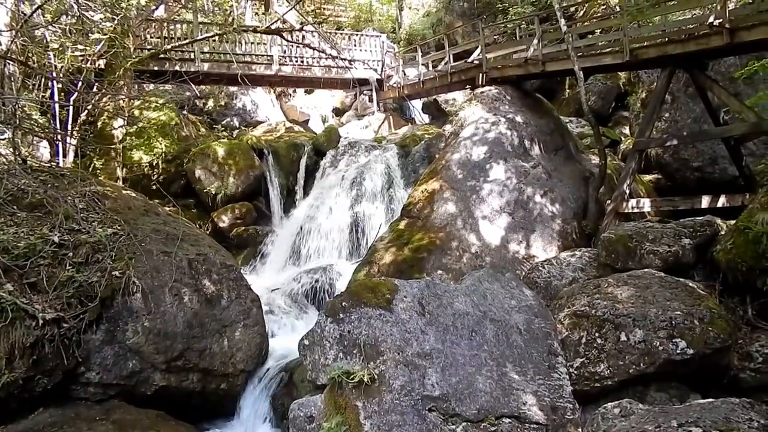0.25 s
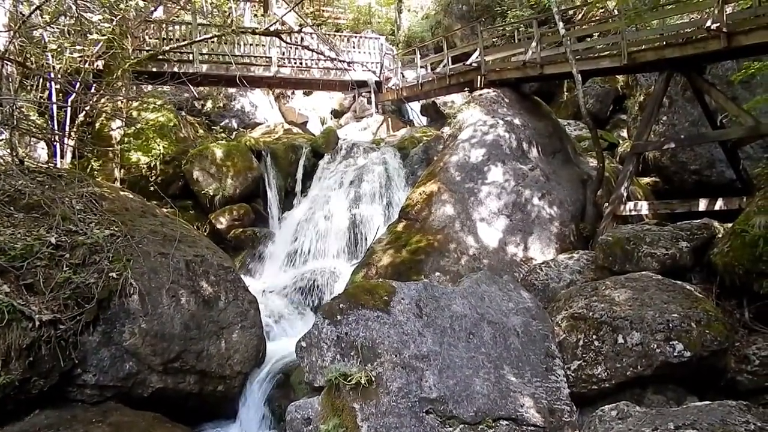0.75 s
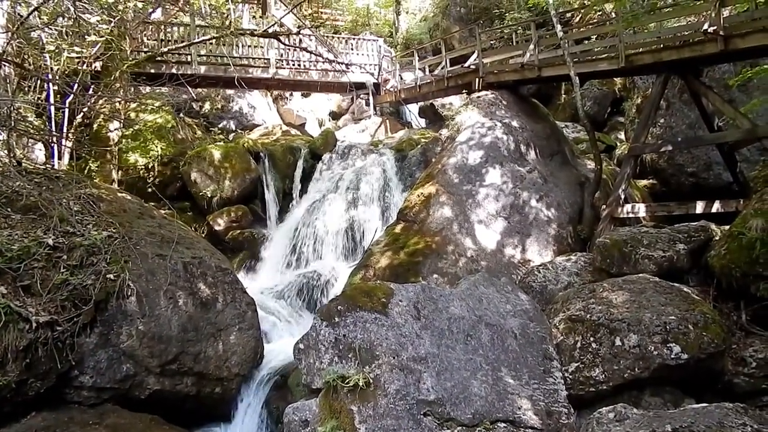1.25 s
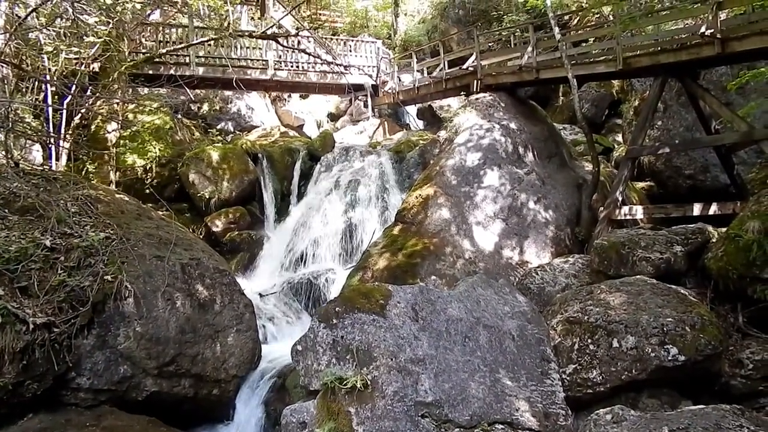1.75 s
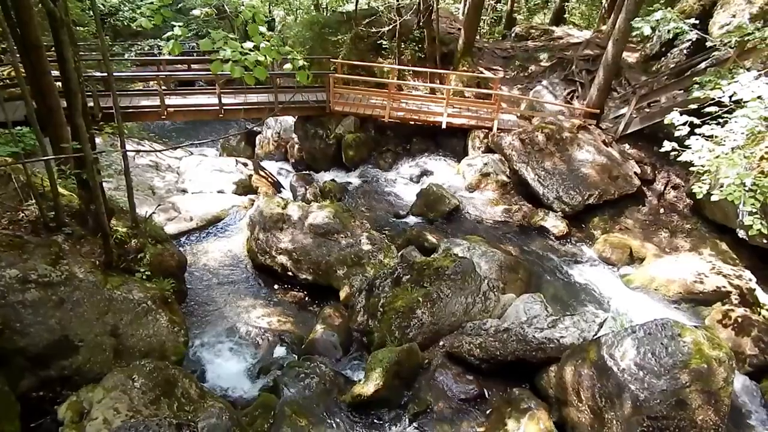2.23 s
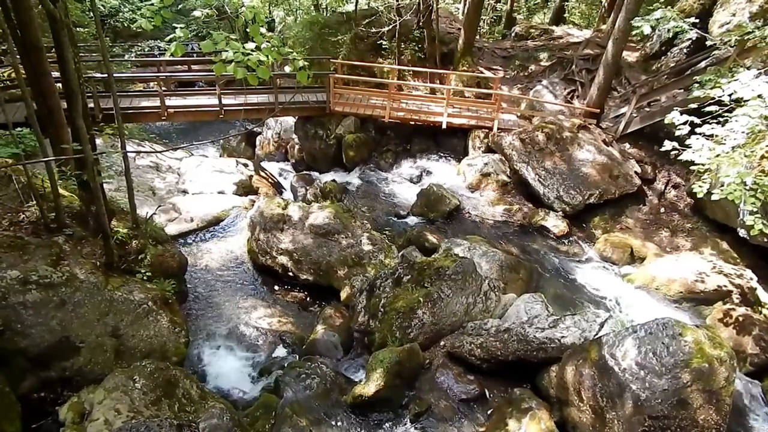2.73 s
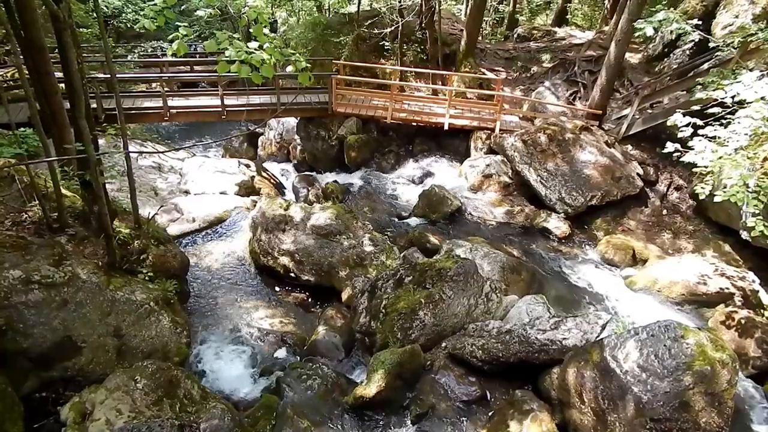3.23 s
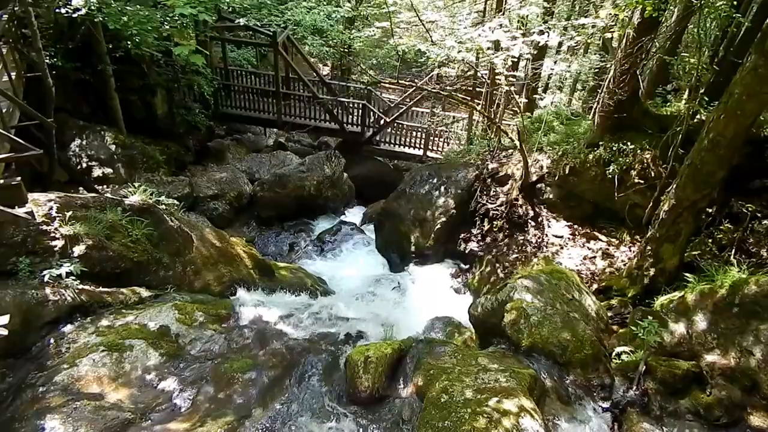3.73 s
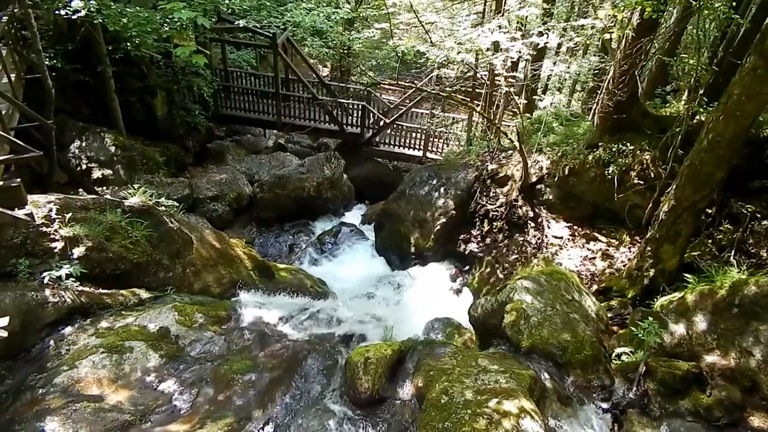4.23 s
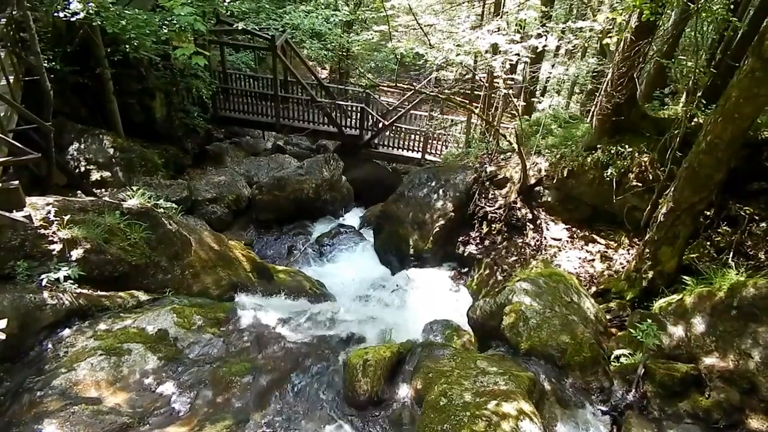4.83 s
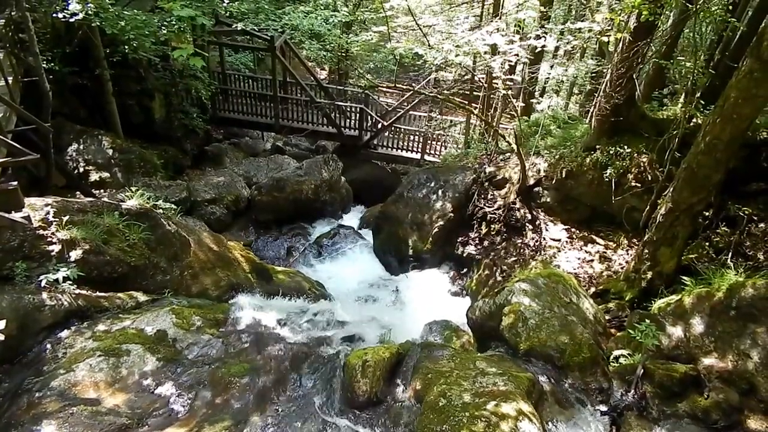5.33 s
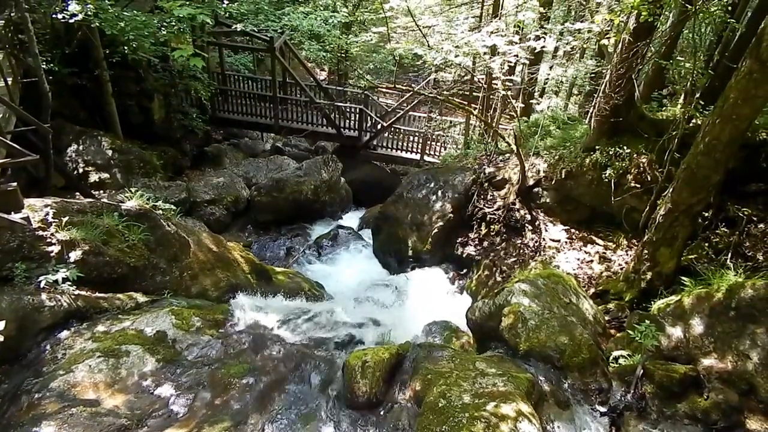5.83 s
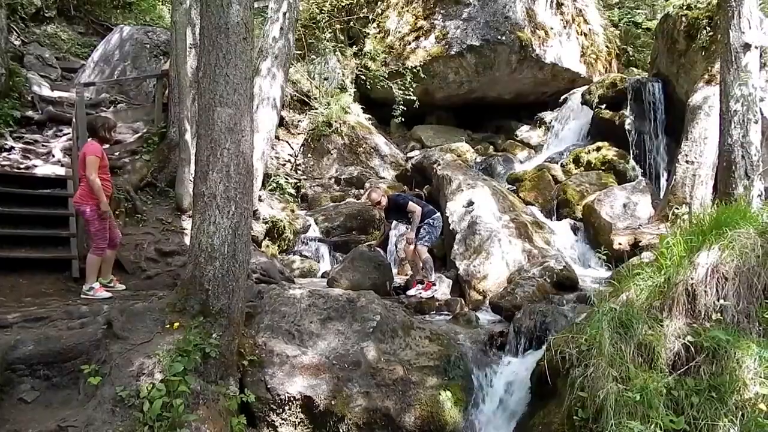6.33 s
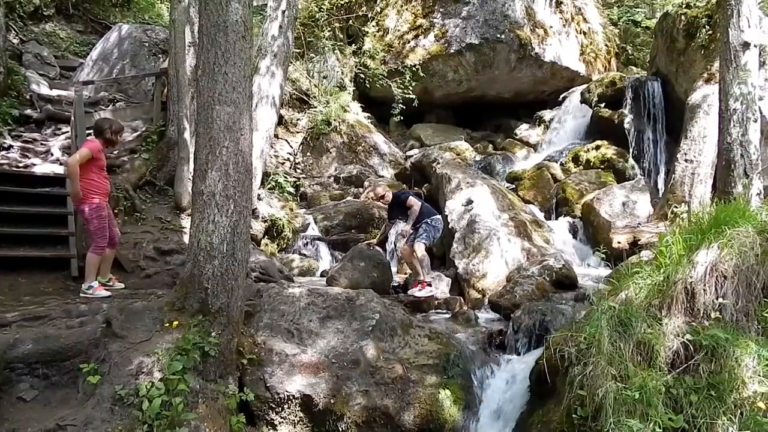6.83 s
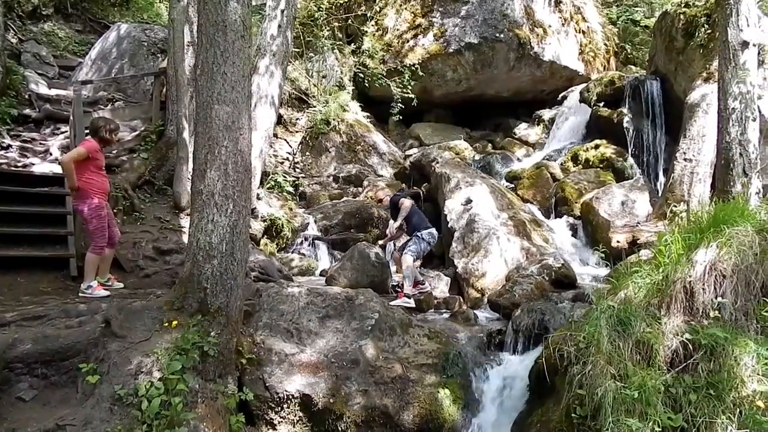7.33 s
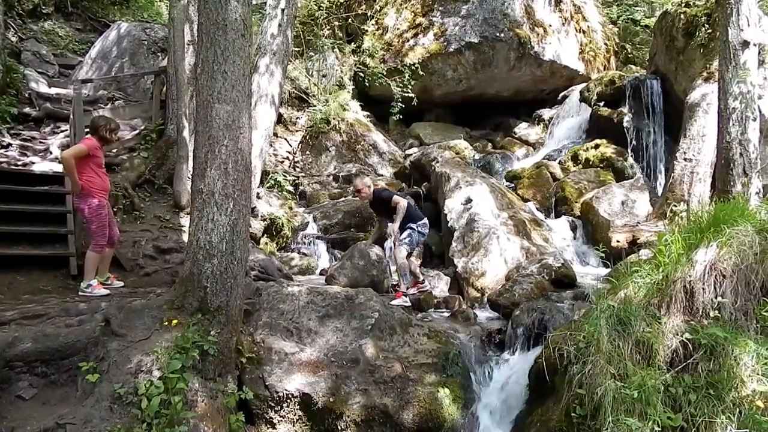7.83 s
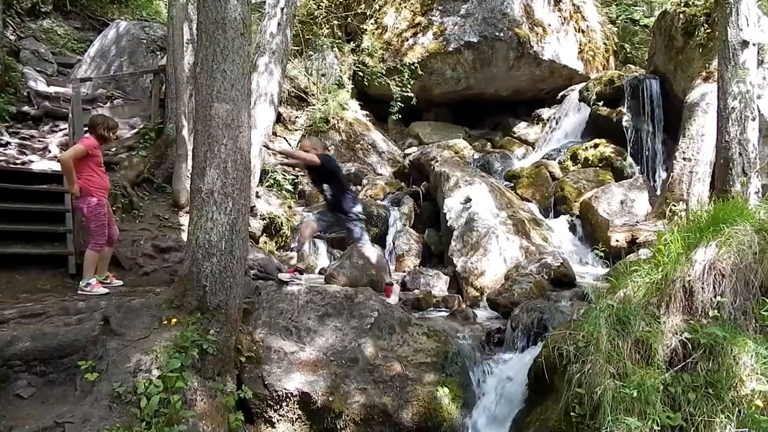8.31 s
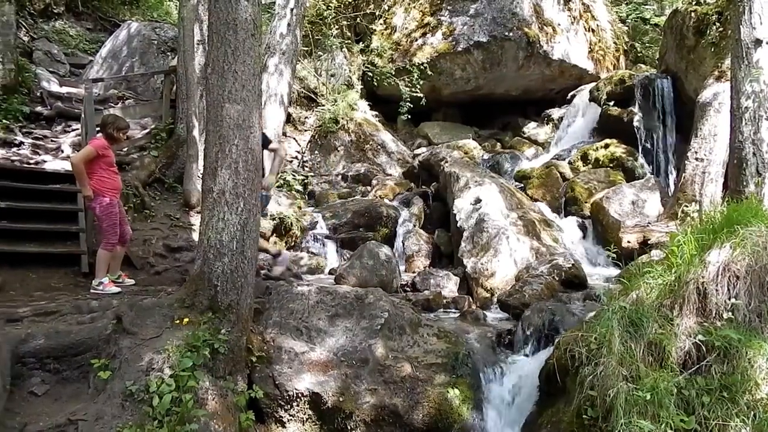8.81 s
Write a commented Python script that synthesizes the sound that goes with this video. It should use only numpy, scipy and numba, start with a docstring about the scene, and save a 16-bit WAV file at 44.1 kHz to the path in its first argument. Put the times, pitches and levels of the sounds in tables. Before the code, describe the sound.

A blackbird-like bird whistles mellow phrases and ends in fading chirps beside a gurgling, splashing brook that grows quieter in a wood.

```python
"""Songbird by a brook

A blackbird-like bird sings beside a gurgling brook in a wood; a farther bird twitters once.
Its two voices whistle, warble and chirp as sine waves with moving pitch; a noise tail scatters the song.
The brook mixes noise, mostly rising bubble rings and short puffs of hiss, and its flow swells and ebbs.
Very faint noise fills the air."""
import sys
import numpy as np
from scipy import signal
from scipy.fft import rfft, irfft, next_fast_len
from scipy.io import wavfile
from scipy.ndimage import uniform_filter1d
from numba import njit

SR = 44100
rng = np.random.default_rng(int(sys.argv[2]) if len(sys.argv) > 2 else 0)


def store_pcm(level_fs):
    """Save levels as 16-bit WAV."""
    pcm = np.round(np.clip(level_fs, -1, 1) * 32767).astype(np.int16)
    wavfile.write(sys.argv[1], SR, np.atleast_2d(pcm).T)


N = 399987
T = np.arange(N) / SR  # time of every sample in seconds
# All levels in the tables are relative: later gains and the mix shift them.


def undb(db):
    """Turn decibels into a plain gain."""
    return 10 ** (np.asarray(db) / 20)


def unit(x):
    """Scale a sound to an average (RMS) strength of 1."""
    return x / np.sqrt(np.mean(x ** 2))


def walk(rate):
    """Random levels held for 1 / rate seconds and smoothed twice; spread near 1."""
    k = int(SR / rate)
    steps = np.repeat(rng.standard_normal(N // k + 1), k)
    return 1.185 * uniform_filter1d(uniform_filter1d(steps, k), k)[:N]


def turn(hz):
    """Add up a moving pitch into the phase of a sine."""
    return 2 * np.pi * np.cumsum(hz) / SR


def edge(n, soft_s=0.0013):
    """Soft start and end of a note, to avoid clicks."""
    i = np.arange(n)
    return np.clip(np.minimum(i, n - i) / (soft_s * SR), 0, 1)


def swell(t, db, attack, release):
    """Level in dB of a note that swells in, holds and dies away."""
    edge_db = 24  # how far below its level a note starts and ends
    start = np.clip(1 - (t - t[0]) / attack, 0, 1) ** 1.3
    end = np.clip(1 - (t[-1] - t) / release, 0, 1) ** 1.3
    return db - edge_db * (start + end)


def arch(start, top, end, from_hz, top_hz, to_hz, bend, db, attack, release):
    """Sample range, pitch and level of a note whose pitch bends through a turning point."""
    part = slice(int(start * SR), int(end * SR))
    t = T[part]
    before = np.clip((top - t) / (top - start), 0, 1)
    after = np.clip((t - top) / (end - top), 0, 1)
    # bend 1 gives straight slopes, more gives a flatter top
    hz = top_hz + (from_hz - top_hz) * before ** bend + (to_hz - top_hz) * after ** bend
    return part, hz, swell(t, db, attack, release)


def bands(colour, shared_db, flicker_db, wide):
    """Octave noise bands that flicker together and alone; wide = side share at 1 and 10 kHz."""
    size = next_fast_len(N)
    hz = np.maximum(np.fft.rfftfreq(size, 1 / SR), 1.)
    colour_hz, colour_db = np.array(colour).T
    gain = undb(np.interp(np.log(hz), np.log(colour_hz), colour_db))
    side = np.interp(np.log(hz), np.log([1000., 10000.]), wide)
    noise = rfft(rng.standard_normal((2, size)))
    pair = gain * (noise[0] + side * noise[1] * np.array([[1], [-1]]))
    out, shared = 0, walk(18)
    for octave in range(4, 15):
        window = np.clip(1 - np.abs(np.log2(hz) - octave), 0, 1)
        level_db = shared_db * shared + flicker_db * walk(8 + octave)
        out = out + irfft(pair * window, size)[:, :N] * undb(level_db)
    return unit(out)


@njit
def grains(count, start, hz, cycles, glide, left, right):
    """Short rings that swell in, glide in pitch (upward if glide > 0) and die within some cycles."""
    out = np.zeros((2, count))
    for g in range(len(start)):
        phase, span = 0., cycles[g] * SR / hz[g]
        for i in range(min(int(2.5 * span), count - start[g])):
            u = i / span
            phase += 2 * np.pi * min(hz[g] * (1 + glide[g] * u), .45 * SR) / SR
            y = 2 * np.sin(phase) * (1 - np.exp(-6 * u)) * np.exp(-2 * u * (1 + u))
            out[0, start[g] + i] += left[g] * y
            out[1, start[g] + i] += right[g] * y
    return out


def ring(s, hz, cycles, glide, db, pan_db):
    """Place rings by time and level; pan_db is left minus right."""
    start = (s * SR).astype(np.int64)
    return grains(N, start, 1. * hz, cycles, glide, undb(db + pan_db / 2), undb(db - pan_db / 2))


def bubbles(count, low_hz, high_hz, cycles, glide, spread_db):
    """Random bubble rings, most of them rising; a few are much louder than the rest."""
    u = rng.random((count, 7)).T
    hz = low_hz * (high_hz / low_hz) ** ((u[1] + u[5]) / 2)
    db = spread_db * np.minimum(-np.log(u[3] + 1e-9), 4)
    pan_db = 7.9 * (2 * u[4] - 1)
    return unit(ring(u[0] * T[-1], hz, cycles * (.4 + u[2]), glide * (1.3 * u[6] - .3), db, pan_db))


def spatter(s, db, low_hz, high_hz, fade_s):
    """Drops bursting on stone: puffs of hiss that die in milliseconds, each from its own side."""
    pan_db = 6.0 * (2 * rng.random(len(s)) - 1)
    kicks = np.zeros((2, N))
    kicks[:, (s * SR).astype(int)] = undb(db + np.array([pan_db, -pan_db]) / 2)
    puffs = signal.lfilter([1], [1, -np.exp(-1 / (fade_s * SR))], kicks)
    mid, side = rng.standard_normal((2, N))
    hiss = puffs * (mid + .55 * side * np.array([[1], [-1]]))
    return signal.sosfilt(signal.butter(2, [low_hz, high_hz], "band", fs=SR, output="sos"), hiss)


def spray(count, low_hz, high_hz, fade_s, spread_db):
    """Random drops; a few are much louder than the rest."""
    u = rng.random((count, 2)).T
    db = spread_db * np.minimum(-np.log(u[1] + 1e-9), 3)
    return unit(spatter(u[0] * T[-1], db, low_hz, high_hz, fade_s))


def plops():
    """Loud bubbles: rings that rise in pitch, the deep ones most."""
    # one row per bubble: start_s, level_db, pitch_hz (each ring starts at 0.92 of this pitch)
    loud_bubbles = [(0.197, -34, 592), (0.566, -30, 993), (0.646, -32, 1520), (0.973, -37, 1220),
                    (1.094, -34, 719), (1.289, -31, 603), (1.34, -29, 829), (1.368, -31, 600),
                    (1.417, -31, 1220), (1.548, -31, 781), (1.746, -31, 764), (1.782, -34, 1490),
                    (1.86, -32, 853), (1.92, -31, 826), (2.253, -35, 646), (2.351, -31, 1200),
                    (3.411, -37, 915), (3.556, -38, 800), (4.475, -42, 800), (4.512, -34, 918),
                    (5.414, -45, 1810), (7.307, -44, 929), (6.034, -48, 557), (6.047, -46, 1350),
                    (6.394, -38, 797), (8.069, -43, 966), (8.265, -38, 996)]
    s, db, hz = np.transpose(loud_bubbles)
    pan_db = 6.0 * (2 * rng.random(len(s)) - 1)
    return ring(s - .001, .92 * hz, .02 * hz + 4, (560 / hz) ** 2, db - 1.5, pan_db)


def ticks():
    """Loud splash ticks: each is one puff of hiss below 7 kHz and one above."""
    # one row per tick: start_s, level_db below 7 kHz, treble_level_db above 7 kHz
    splashes = [(0.6059, -36, -52), (0.6679, -41, -45), (1.0459, -40, -53), (1.3669, -28, -48),
                (1.5892, -33, -51), (1.8261, -43, -52), (2.0352, -42, -57), (2.1495, -40, -61),
                (2.2837, -39, -49), (2.3012, -42, -57), (2.5126, -43, -55), (2.8115, -40, -62),
                (2.9644, -45, -56), (3.6031, -36, -52), (5.8181, -34, -47), (6.1305, -60, -54),
                (6.3948, -45, -60)]
    s, db, treble_db = np.transpose(splashes)
    body = spatter(s, db - 1.5, low_hz=2200, high_hz=7000, fade_s=.003)
    return body + spatter(s, treble_db + 6, low_hz=7000, high_hz=13500, fade_s=.002)


def brook():
    """Rush, bubbles and spray follow the flow; the loudest plops and ticks stand out."""
    # how the water swells and ebbs: time_s, gurgle_level_db, spray_minus_gurgle_db
    water = [(0, -44.5, -22), (1.0, -48, -19), (1.4, -43.5, -20.5), (2.3, -48.5, -17), (2.7, -57, -14.5),
             (3.7, -52.5, -22), (4.0, -56, -18), (4.55, -54.5, -21), (5.2, -66, -17), (6.351, -58, -21.5),
             (9.07, -61.5, -24.5)]
    # where the water is heard: time_s, left_minus_right_db
    bank_pan = [(2.2, -2.5), (2.8, 1.5), (7.5, 2), (8.2, -1)]
    # tone colour of the rush: pitch_hz, density_db (per Hz)
    rush_colour = [(170, -44), (310, -14.5), (530, -7.5), (800, -4), (3400, -14), (12400, -30),
                   (16000, -44.5)]
    s, gurgle_db, spray_db = np.transpose(water)
    gurgle_db, spray_db = np.interp(T, s, gurgle_db), np.interp(T, s, spray_db)
    pan_db = np.interp(T, *np.transpose(bank_pan))
    rush = bands(rush_colour, shared_db=.8, flicker_db=1.8, wide=[.5, .65])
    treble = signal.sosfilt(signal.butter(1, 3000, "high", fs=SR, output="sos"), rush)
    bright = undb(spray_db + 19)  # treble share of the flow
    surge = undb(3.0 * walk(5))  # splashes come in clumps
    flow = undb(-6) * (rush + (bright - 1) * treble) * np.sqrt(surge)
    flow += undb(-2.5) * surge * bubbles(
        count=2200, low_hz=450, high_hz=1800, cycles=15., glide=.8, spread_db=3.8)
    flow += undb(-19.5) * bubbles(
        count=120, low_hz=280, high_hz=450, cycles=9., glide=.6, spread_db=3.0)
    flow += undb(-8) * surge * bubbles(
        count=1800, low_hz=900, high_hz=3000, cycles=12., glide=.25, spread_db=4.2)
    flow += undb(-13.5) * bright * surge * spray(
        count=520, low_hz=2040, high_hz=5200, fade_s=.004, spread_db=4.0)
    flow += undb(-25) * bright * spray(
        count=400, low_hz=5000, high_hz=15500, fade_s=.002, spread_db=4.0)
    return flow * undb(gurgle_db + np.array([pan_db, -pan_db]) / 2) + plops() + ticks()


def air():
    """Very faint, mostly low noise, slightly uneven in level."""
    # tone colour: pitch_hz, density_db (per Hz)
    air_colour = [(25, -32), (85, -27.5), (128, -9), (170, -17.5), (300, -4), (365, -11.5), (860, -7.5),
                  (1800, -11.5), (4000, -24.5), (16000, -32)]
    return undb(-68) * bands(air_colour, shared_db=-0.7, flicker_db=-0.5, wide=[.55, .7])


def glides(rows, hoarse, waver_db):
    """Sines that ease from one pitch toward another, unsteady in pitch and level."""
    out = np.zeros(N + SR)
    jitter = 1 + hoarse * np.resize(walk(400), N + SR)
    for s, from_hz, to_hz, glide, length, db in rows:
        t = np.arange(int(length * SR)) / SR
        hz = (to_hz + (from_hz - to_hz) * np.exp(-t / glide)) * jitter[int(s * SR):][:len(t)]
        hump = np.sin(np.pi * (t / length) ** .6) ** .8
        out[int(s * SR):][:len(t)] += undb(db) * hump * np.sin(turn(hz))
    return out[:N] * undb(waver_db * walk(110))


def chirps():
    """Short gliding notes in groups of repeats."""
    # one row per group: first_start_s, repeats, period_s, from_hz, to_hz, glide_s (time constant),
    # length_s, level_db, level_step_db (per repeat)
    groups = [(0, 2, .122, 7650, 7620, .034, .06, -58, 0), (.242, 3, .074, 2550, 3600, .015, .026, -47, 0),
              (.275, 3, .075, 5200, 5450, .01, .03, -59, 0),
              (1.9, 6, .1414, 4500, 2700, .018, .03, -57.5, .3),
              (4.102, 3, .0177, 5100, 7500, .01, .012, -61, -2),
              (4.712, 2, .192, 4450, 4640, .03, .078, -47, -6),
              (4.79, 2, .187, 4500, 800, .042, .032, -54, -4)]
    repeats = [(s + k * period, from_hz, to_hz, glide, length, db + k * step)
               for s, count, period, from_hz, to_hz, glide, length, db, step in groups
               for k in range(round(count))]
    return glides(repeats, hoarse=.016, waver_db=3.5)


def catches():
    """Brief catches where the main voice sags and chokes: pitch drop and level drop over time."""
    # one row per catch: middle_s, drop_db
    chokes = [(2.879, 9), (2.912, 13.5), (3.404, 9), (3.652, 6), (3.797, 5), (7.383, 14), (7.417, 19),
              (7.448, 15), (7.479, 11)]
    half_length_s, sag_hz_per_db = .011, 17
    s, db = np.transpose(chokes)[:, :, None]
    dip = np.clip(1.6 * (1 - np.abs(T - s) / half_length_s), 0, 1)
    drop_db = (db * dip).sum(axis=0)
    return sag_hz_per_db * drop_db, drop_db


def whistles(sag_hz, sag_db):
    """Near-sine notes; the second voice's pull makes both voices flutter in pitch and level."""
    # main voice: start_s, turn_s, end_s, start_hz, turn_hz, end_hz, bend (no unit), level_db,
    # attack_s, release_s
    main_notes = [(2.695, 2.7, 2.765, 2160, 2130, 1700, 1.05, -33.5, .045, .025),
                  (2.772, 2.87, 2.95, 1695, 2215, 2080, 9.0, -30, .013, .012),
                  (3.015, 3.04, 3.15, 2230, 2280, 1720, 1.05, -27, .028, .028),
                  (3.218, 3.236, 3.405, 2150, 2370, 2010, 1.6, -27.5, .018, .016),
                  (3.552, 3.768, 3.885, 1474, 2060, 1455, 1.2, -29, .08, .05),
                  (6.972, 7.05, 7.122, 1850, 2175, 1640, 2.2, -30.5, .06, .022),
                  (7.272, 7.36, 7.535, 2980, 2185, 2120, 4.0, -27, .03, .012),
                  (7.578, 7.6, 7.628, 1510, 1490, 1600, 3.0, -37, .04, .004),
                  (7.618, 7.67, 7.692, 1490, 2050, 1920, 4.0, -28, .006, .016)]
    # second voice: flutter_hz (average rate), flutter_end_s, note (columns as in the main voice)
    upper_notes = [(74, 3.09, (3.016, 3.05, 3.15, 2530, 2800, 2540, .5, -41.5, .014, .07)),
                   (125, 3.795, (3.62, 3.765, 3.88, 2570, 2800, 2200, 1.5, -44.5, .075, .09))]
    octave_db = -49
    out, flutter = np.zeros(N), np.zeros(N)
    for rate_hz, until_s, note in upper_notes:
        part, hz, db = arch(*note)
        # the pull grows with the second voice's level and fades out at until_s
        pull = np.clip((db + 52) / 7, 0, 1) * np.clip((until_s - T[part]) / .015, 0, 1)
        cycle = turn(rate_hz * (1 + 0.25 * walk(60)[part]))
        flutter[part] = pull * (.5 + .5 * np.cos(cycle)) ** 1.53
        voice = np.sin(turn(hz - 200 * flutter[part]))
        out[part] += undb(db - 10 * flutter[part] + 3) * voice * edge(len(hz))
    for note in main_notes:
        part, hz, db = arch(*note)
        shift_hz = sag_hz[part] + 220 * (flutter[part] - 0.292 * flutter[part].mean())
        phase = turn(hz * (1 + .006 * walk(700)[part]) - shift_hz)
        breath = undb(db - sag_db[part] - 7.7 * flutter[part] + 1.2 * walk(60)[part])
        voice = np.sin(phase) + undb(octave_db) * np.sin(2 * phase)
        out[part] += breath * voice * edge(len(hz))
    return out


def chips():
    """Quick notes that flick upward in pitch."""
    # one row per chip: start_s, from_hz, aim_hz (the flick runs a quarter of the way beyond), level_db
    flicks = [(4.148, 3350, 4200, -40), (4.195, 2900, 4000, -39), (4.242, 2700, 3800, -37.5),
              (4.289, 2750, 3300, -38.5)]
    chip_s = .0095
    rows = [(s, from_hz, 2 * aim_hz - from_hz, chip_s, chip_s, db) for s, from_hz, aim_hz, db in flicks]
    return glides(rows, hoarse=.016, waver_db=3.5)


def warbles():
    """Three partials shaken by a vibrato that deepens with pitch; the throat passes only the middle."""
    # one row per warble: crest_s (a vibrato crest), note (start_s, turn_s, end_s, start_hz, turn_hz,
    # end_hz, bend (no unit), level_db, attack_s, release_s); pitches are of the low fundamental
    shaken_notes = [(4.341, (4.33, 4.44, 4.46, 1230, 1680, 1300, 1.3, -45.5, .008, .015)),
                    (4.527, (4.5, 4.585, 4.635, 990, 1400, 1380, 1.1, -47.5, .02, .015))]
    # fundamental and overtones, lowest first: level_db
    partials = [-8, -1, -7]
    vibrato_hz = 52.5
    out = np.zeros(N)
    for crest_s, note in shaken_notes:
        part, hz, db = arch(*note)
        depth = np.clip((hz - 900) / 5200, 0, .085)
        shake = depth * np.cos(2 * np.pi * vibrato_hz * (T[part] - crest_s))
        phase = turn(hz * (1 + shake + .033 * walk(600)[part]))
        stack = 0
        for k, partial_db in enumerate(partials):
            stack = stack + undb(partial_db + 4.0 * walk(150)[part]) * np.sin((k + 1) * phase)
        out[part] += undb(db + 15 * shake) * stack * edge(len(hz))  # level throbs with the vibrato
    return signal.sosfilt(signal.butter(7, [1400, 3850], "band", fs=SR, output="sos"), out)


def far_bird():
    """The farther bird: overlapping hoarse gliding strands."""
    # one row per strand: start_s, from_hz, to_hz, glide_s (time constant), length_s, level_db
    strands = [(6.218, 3800, 3780, .02, .13, -59), (6.225, 3650, 3250, .04, .07, -59),
               (6.315, 3550, 3100, .05, .095, -58), (6.375, 4150, 3650, .05, .16, -59),
               (6.553, 3850, 3400, .01, .06, -59), (6.61, 3800, 3880, .035, .18, -66)]
    return glides(strands, hoarse=.02, waver_db=4.0)


def squeeze():
    """Squeezed note: two voices modulate each other, giving difference and sum tones."""
    # pitch path of the note: time_s, low_voice_hz, high_voice_hz
    path = [(7.762, 3104, 7100), (7.8, 3060, 7570), (7.848, 2560, 7450), (7.862, 2720, 7600),
            (7.878, 1700, 7600), (7.892, 2450, 7650), (7.908, 2100, 7860), (7.918, 3005, 8080),
            (7.932, 2620, 8470), (8.0, 3150, 7620), (8.045, 3270, 7100)]
    # the note weakens and rasps as its low voice sinks under this pitch
    choke_hz, choke_db_per_khz, choke_rasp = 2700, 15, .12
    out = np.zeros(N)
    s, low_hz, high_hz = np.transpose(path)
    part = slice(int(s[0] * SR), int(s[-1] * SR))
    low_hz, high_hz = np.interp(T[part], s, low_hz), np.interp(T[part], s, high_hz)
    choke_khz = np.maximum(choke_hz - low_hz, 0) / 1000
    db = swell(T[part], db=-36, attack=.035, release=.03) - choke_db_per_khz * choke_khz
    low = turn(low_hz * (1 + choke_rasp * choke_khz * walk(500)[part]))
    high = turn(high_hz * (1 + .012 * walk(250)[part]))

    def rasp(level_db):
        """A rough, wavering level around level_db."""
        return undb(level_db) * undb(4.0 * walk(90)[part])

    # choking weakens the difference tone and strengthens the octave
    difference_db = -21 - 9 * np.clip((choke_hz + 100 - low_hz) / 200, 0, 1)
    octave_db = -27 + 12 * np.clip((choke_hz - low_hz) / 300, 0, 1)
    tones = np.sin(low) * undb(1.9 * walk(70)[part])
    tones += rasp(-24) * np.sin(high)
    tones += rasp(difference_db) * np.sin(high - low)
    tones += rasp(-35) * np.sin(high + low)
    tones += rasp(octave_db) * np.sin(2 * low)
    out[part] = undb(db) * tones
    return out


def chucks(rounds, first_db):
    """Chucks: two voices glide at once, with hoarse overtones that fade faster than they do."""
    # low voice, then high voice: from_hz, to_hz, glide_s (time constant), length_s, level_db
    voices = [(2204, 2950, 0.0095, 0.031, 1), (2750, 3397, 0.0091, 0.035, -4.5)]
    # overtones: low_voice_multiple, high_voice_multiple, level_db
    chuck_tones = [(2, 0, -14), (1, 1, -15)]
    low, high = voices
    pairs = [(s, from_hz, to_hz, glide, length, db + voice_db)
             for s, db in rounds for from_hz, to_hz, glide, length, voice_db in voices]
    overtones = [(s, i * low[0] + j * high[0], i * low[1] + j * high[1], low[2], low[3],
                  db + tone_db + .5 * (db - first_db))
                 for s, db in rounds for i, j, tone_db in chuck_tones]
    return glides(pairs, hoarse=.027, waver_db=2.0) + glides(overtones, hoarse=.035, waver_db=3.0)


def tsees(rounds):
    """Tsees: a thin sine sweeps up to a high pitch and holds, dipping in level on the way."""
    rise_s, hold_s, lag_s = .024, .058, .072  # the lag is counted from the start of the chuck
    low_hz, top_hz = 2750, 7630
    out = np.zeros(N + SR)
    t = np.arange(int((rise_s + hold_s) * SR)) / SR
    rise = np.minimum(t / rise_s, 1)
    hz = low_hz + (top_hz - low_hz) * np.sin(np.pi / 2 * rise) ** 2
    for s, db in rounds:
        level = undb(db - 22 - 5 * np.sin(np.pi * rise))
        hump = np.sin(np.pi * t / t[-1]) ** .25
        voice = np.sin(turn(hz * (1 + .008 * walk(400)[:len(t)])))
        out[int((s + lag_s) * SR):][:len(t)] += level * hump * voice
    return out[:N] * undb(4.0 * walk(90))


def refrain():
    """Closing refrain: a two-voiced chuck then a thin upward tsee, each round fainter."""
    # one entry per round: start_s
    starts = [8.091, 8.262, 8.435, 8.619, 8.817, 9.018]
    first_db, fade_db = -44, 2.6  # fade is per round
    rounds = [(s, first_db - k * fade_db) for k, s in enumerate(starts)]
    return chucks(rounds, first_db) + tsees(rounds)


def wood(song):
    """Scatter from trunks and leaves: a decaying noise tail, different in each ear."""
    fall_60db_s, level_db = .44, -10.5
    t = np.arange(SR) / SR
    mid, side = rng.standard_normal((2, SR))
    tail = (mid + 1.4 * side * np.array([[1], [-1]])) * undb(-60 * t / fall_60db_s) * (t > .008)
    tail = tail / np.sqrt(np.mean(tail ** 2) * SR)
    return undb(level_db) * signal.fftconvolve(song[None], tail, axes=1)[:, :N]


def scene():
    """Mix the near song, the farther bird, the brook, the wood's scatter and the air."""
    song = chirps() + whistles(*catches()) + chips() + warbles() + squeeze() + refrain()
    song = np.sqrt(2) * song
    far = far_bird()
    # the farther bird is heard more through the wood than directly
    return song + far + brook() + wood(song + undb(11) * far) + air()


def record(dry):
    """A steep low-pass filter cuts the sound above 15.8 kHz."""
    return signal.sosfilt(signal.ellip(10, .2, 60, 15800, fs=SR, output="sos"), dry)


dry = scene()
out = record(dry)
store_pcm(out)
```